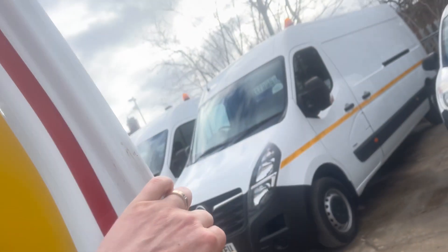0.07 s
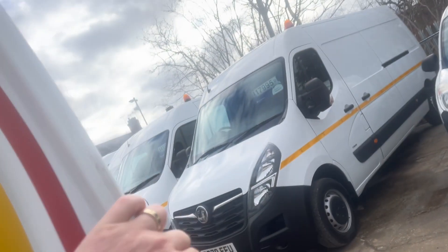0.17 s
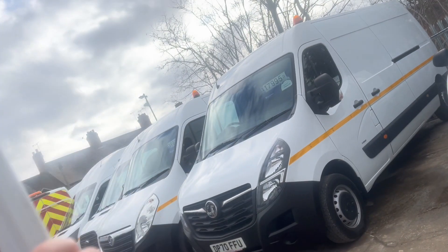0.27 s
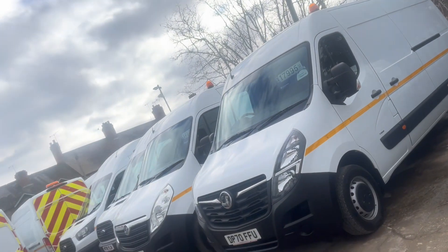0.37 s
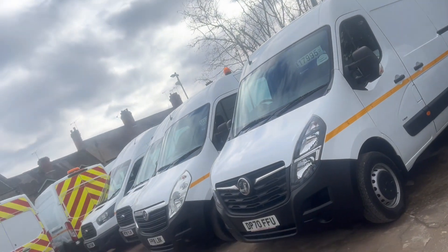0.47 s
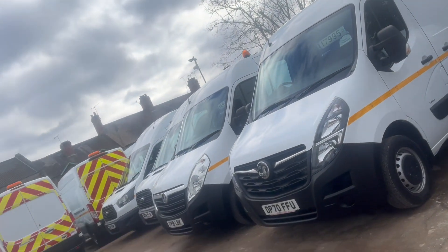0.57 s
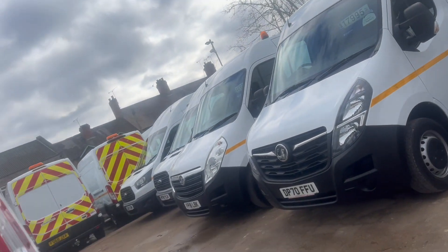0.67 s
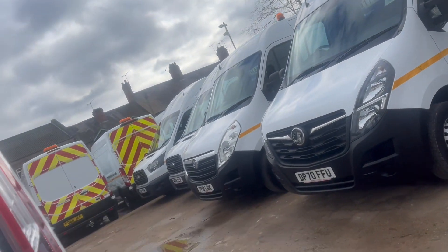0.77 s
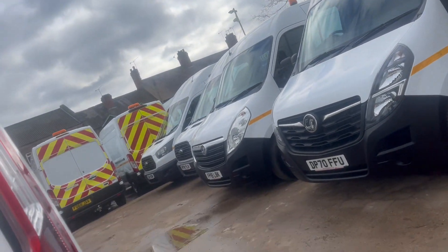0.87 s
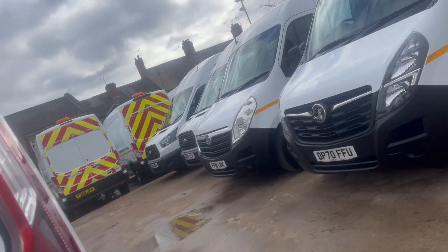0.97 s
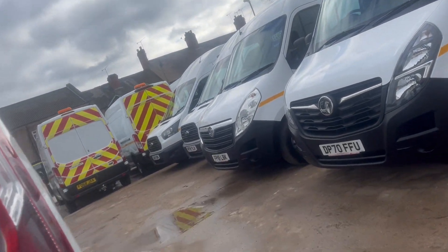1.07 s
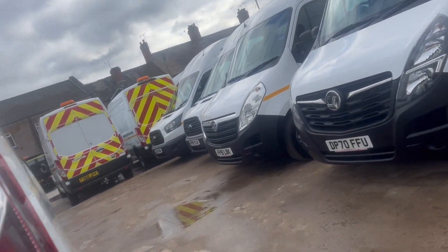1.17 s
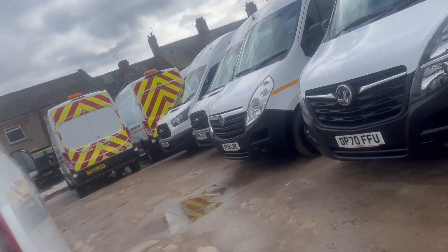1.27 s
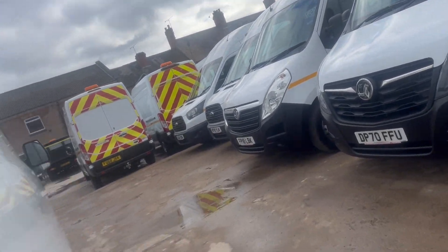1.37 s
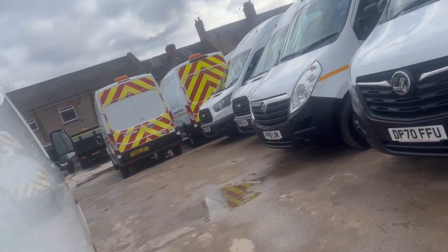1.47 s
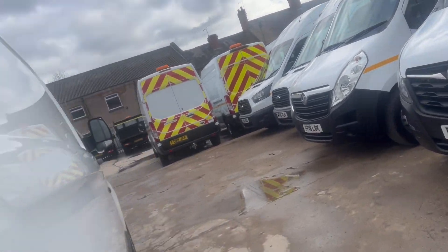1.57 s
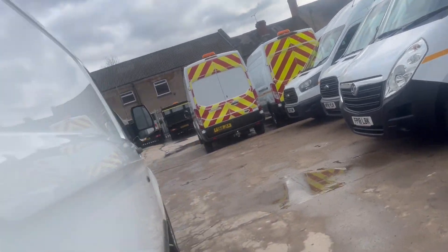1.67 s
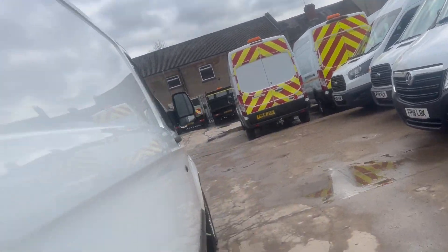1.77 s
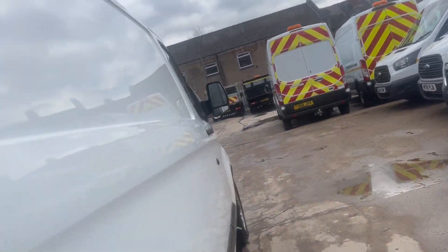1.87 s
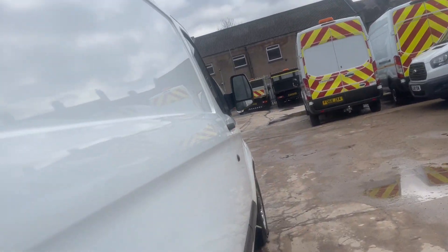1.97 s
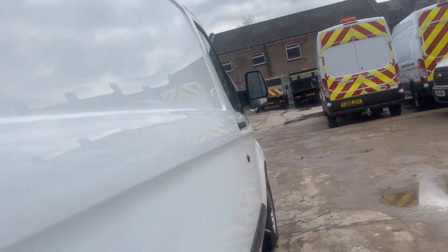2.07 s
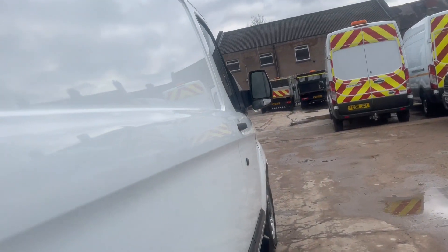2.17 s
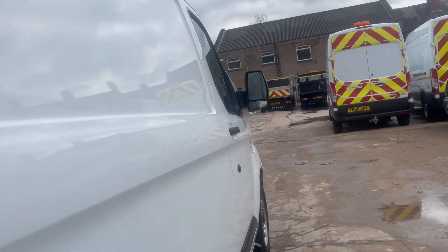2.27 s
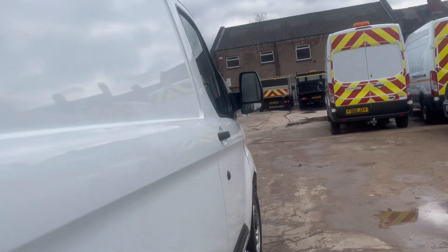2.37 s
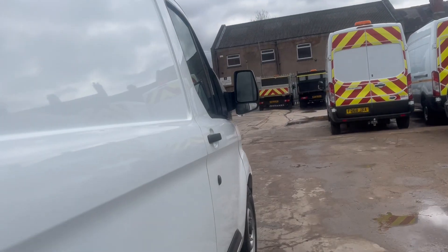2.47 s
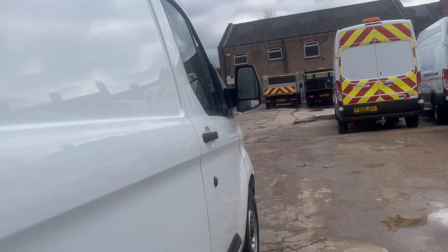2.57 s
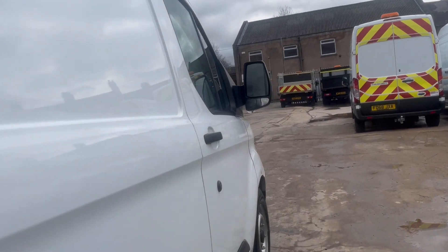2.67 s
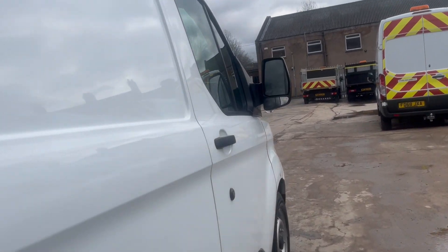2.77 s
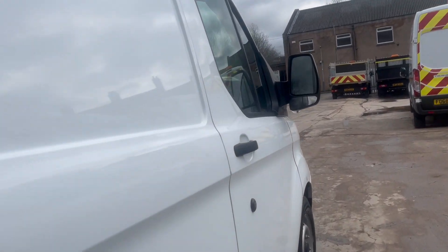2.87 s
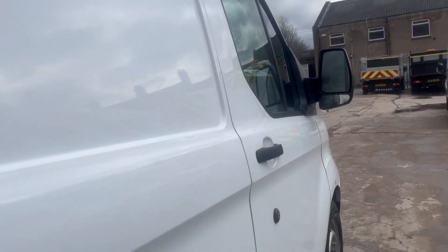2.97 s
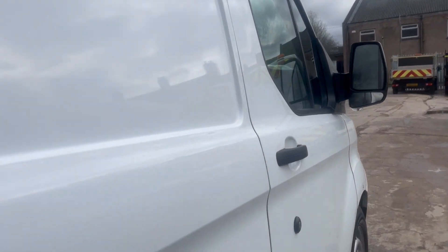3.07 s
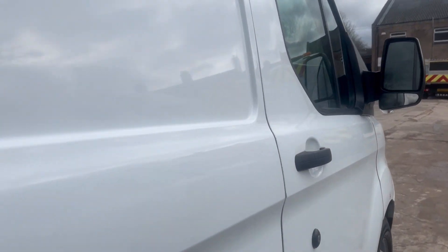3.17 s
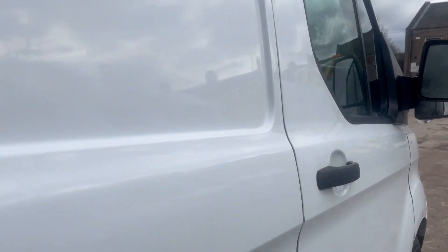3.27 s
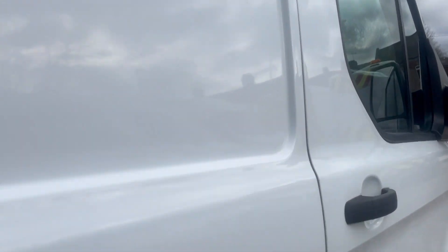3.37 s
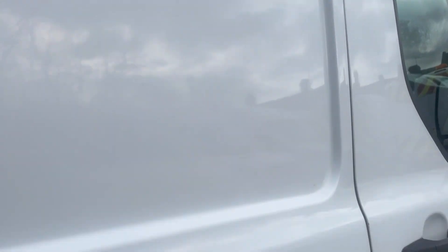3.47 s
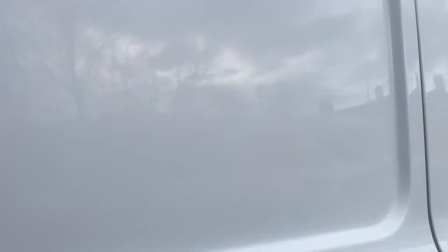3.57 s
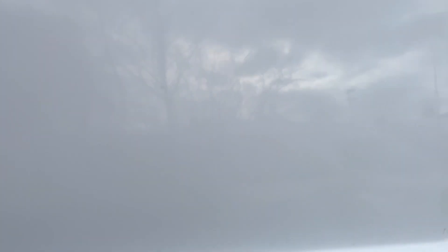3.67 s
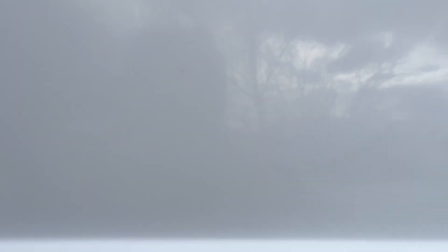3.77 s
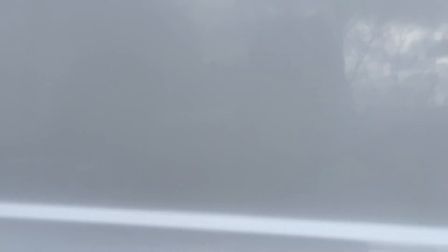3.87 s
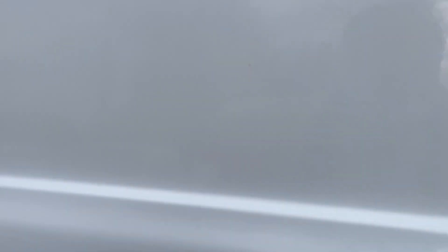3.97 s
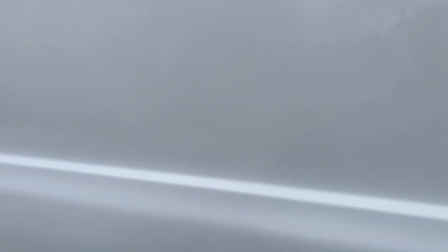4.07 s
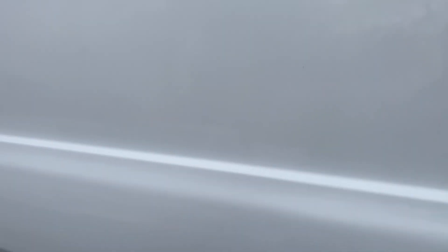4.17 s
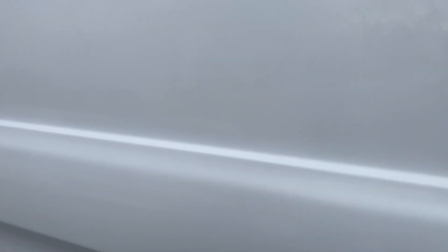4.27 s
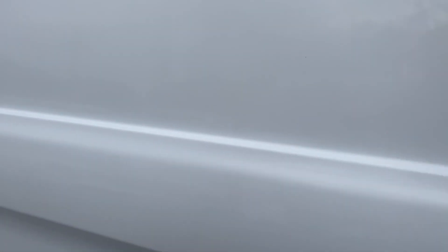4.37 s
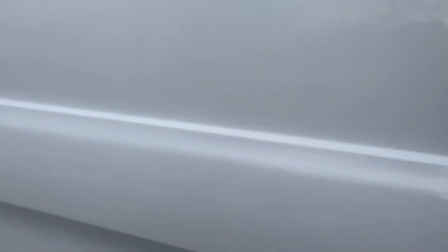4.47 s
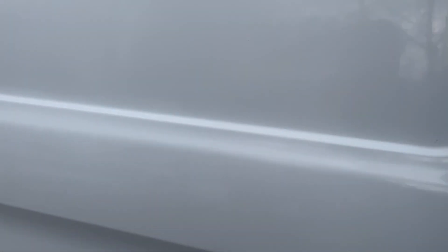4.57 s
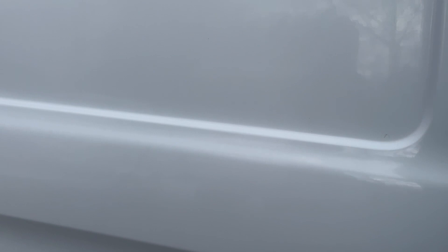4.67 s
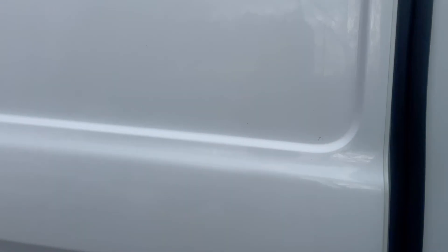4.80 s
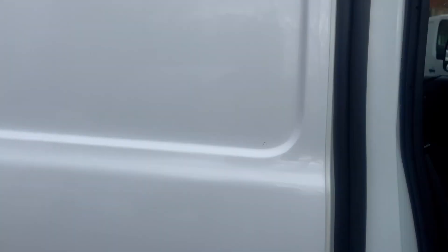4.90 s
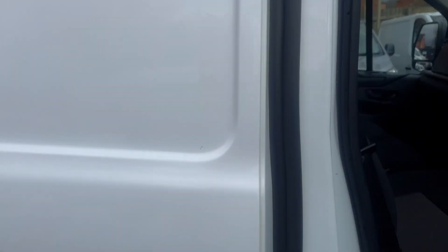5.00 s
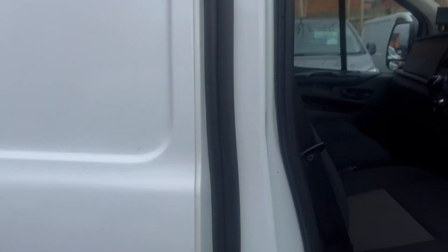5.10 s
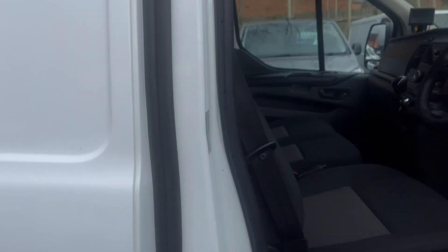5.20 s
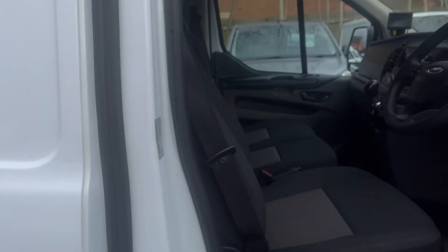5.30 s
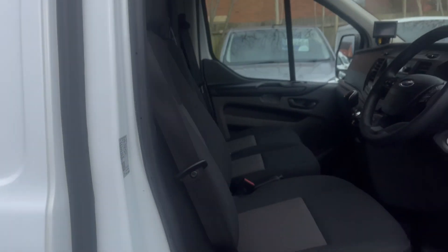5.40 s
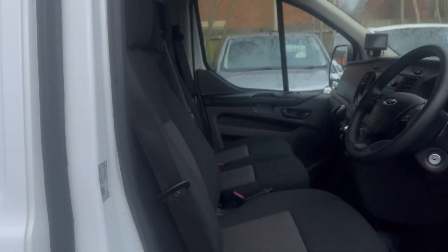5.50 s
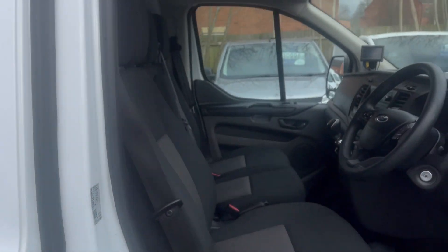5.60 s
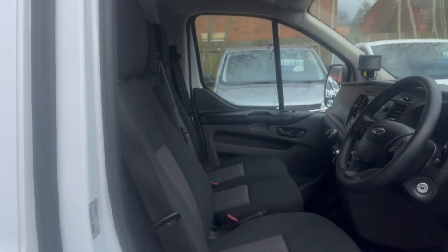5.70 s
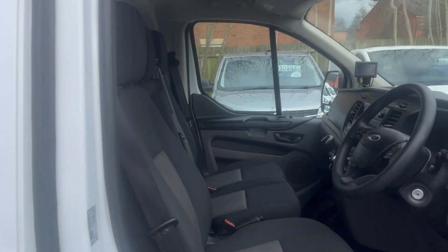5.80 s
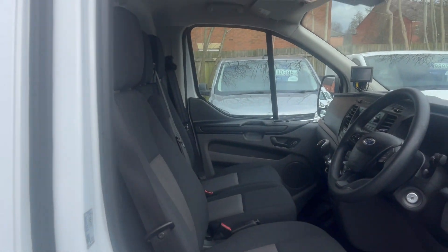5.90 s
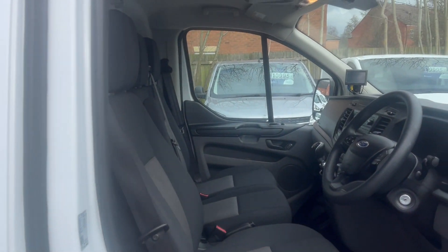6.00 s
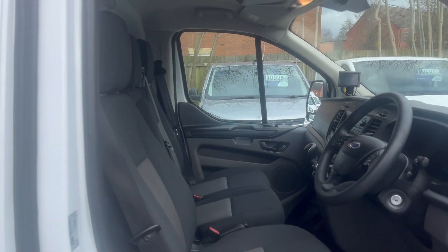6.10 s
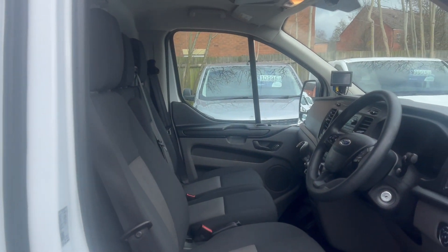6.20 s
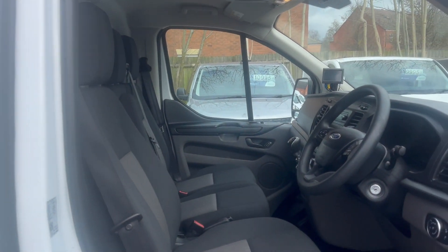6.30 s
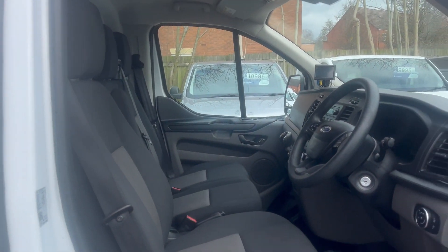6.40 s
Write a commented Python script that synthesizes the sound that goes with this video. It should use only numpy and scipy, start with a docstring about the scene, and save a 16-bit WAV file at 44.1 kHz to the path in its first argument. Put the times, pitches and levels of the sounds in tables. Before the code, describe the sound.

A van's metal door bangs shut outdoors; someone walks over gritty concrete, then a handle clunks and a door opens with small clicks.

```python
"""Van doors in an open yard

The rear doors are pushed to and slammed; someone walks over gritty concrete along the side, pulls the
cab handle and swings the door open. Impacts excite the modes of the steel panels and rattle the trim.
Friction makes cloth rustle and a hinge creak; small parts click over far traffic and faint birds.
All is heard at the two microphone ports of a phone in the walker's hand, where low air thuds."""
import sys
import numpy as np
from scipy import signal
from scipy.fft import rfft, irfft, next_fast_len
from scipy.io import wavfile
from scipy.ndimage import uniform_filter1d

SR = 44100
rng = np.random.default_rng(int(sys.argv[2]) if len(sys.argv) > 2 else 0)


def to_wav(s):
    """Save 16-bit WAV."""
    ch = np.atleast_2d(s).T  # columns
    pcm = np.round(np.clip(ch, -1, 1) * 32767)  # PCM
    wavfile.write(sys.argv[1], SR, pcm.astype(np.int16))


N = 284224
SIZE = next_fast_len(N)
TIME = np.arange(N) / SR
FREQ = np.maximum(np.arange(SIZE // 2 + 1) * SR / SIZE, 1)
DIRECT = np.array([[1], [0], [0]])  # the first of three paths: direct, left scatter, right scatter


def undb(db):
    """Amplitude ratio of a level in decibels."""
    return 10 ** (np.asarray(db) / 20)


def along(table, hz=FREQ):
    """Interpolation of (frequency [Hz], value) rows on a logarithmic frequency axis."""
    f, values = np.transpose(table)
    return np.interp(np.log(hz), np.log(np.maximum(f, 1)), values)


def curve(table, column, outside=-100):
    """Linear interpolation of one column over time, smoothed over 10 ms."""
    times, values = np.transpose(table)[[0, column]]
    return uniform_filter1d(np.interp(TIME, times, values, left=outside, right=outside), size=441)


def unit(x):
    """Normalisation to an rms of 1."""
    return x / np.sqrt(np.mean(x ** 2))


def shape(x, gain):
    """Filtering by multiplication of the spectrum."""
    return irfft(rfft(x, SIZE) * gain, SIZE)[..., :N]


def noise(gain):
    """Three uncorrelated noises of one spectrum, one for each path."""
    spectra = rng.standard_normal((3, 2 * len(FREQ))).view(complex)
    return unit(irfft(spectra * gain, SIZE)[:, :N])


def band(hz, octaves):
    """Gaussian passband on a logarithmic frequency axis."""
    return np.exp(-.5 * (np.log2(FREQ / hz) / octaves) ** 2)


def wander(rate):
    """Random modulation: ramps between values drawn rate times a second, with a spread near 1."""
    hold = int(SR / rate)
    return 1.38 * uniform_filter1d(np.repeat(rng.standard_normal(N // hold + 1), hold), hold)[:N]


def decay(t, t60):
    """Exponential damping by 60 dB in t60."""
    return np.exp(-np.log(1000) * t / t60)


def add(track, s, sound):
    """Superposition of a sound on a track at time s."""
    i = int(s * SR)
    track[..., i:i + sound.shape[-1]] += sound[..., :N - i]


def swell(s, db, rise, fall):
    """Start time and power of an exponential swell peaking at s; rise and fall each span 20 dB."""
    start = max(s - 3 * rise, 0)
    t = start + TIME[:int((s - start + 3 * fall) * SR)]
    return start, undb(2 * (db - 20 * np.where(t < s, (s - t) / rise, (t - s) / fall)))


def layered(events, bed_db, bed_offset_db):
    """Incoherent addition: gains of two bands, the second offset, as swells add in power to a bed."""
    power = undb(2 * np.array([bed_db, bed_db + bed_offset_db]))
    for *outline, offset_db in events:
        start, part = swell(*outline)
        add(power, start, part * undb(2 * np.array([[0], [offset_db]])))
    return np.sqrt(power)


# Ambient spectrum: (frequency [Hz], relative density [dB])
YARD_SPECTRUM = [(120, -20), (200, -8), (349, -5), (420, -11.5), (698, -10), (1790, -18), (2760, -39.5),
                 (5520, -27.5), (7290, -48), (8000, -81.5), (10400, -90), (17600, -120)]


def yard(level_db=-53):
    """Ambient noise: distant traffic and breeze, in octave bands that fluctuate independently."""
    air = rfft(rng.standard_normal((3, SIZE))) * undb(along(YARD_SPECTRUM))
    bands = [undb(1.57 * wander(1.43) + 1.16 * wander(3.3)) * irfft(air * band(hz, 0.36), SIZE)[:, :N]
             for hz in 250 * 2. ** np.arange(6)]
    return undb(level_db) * unit(sum(bands))


# Far calls: (start [s], end [s], first frequency [Hz], last frequency [Hz], level [dB])
BIRD_CALLS = [(1.95, 2.085, 2890, 2930, -66), (2.02, 2.06, 3100, 2950, -65), (5.757, 5.8, 3950, 3760, -60),
              (5.398, 5.425, 5100, 5300, -62), (5.398, 5.425, 4050, 4650, -63)]


def birds():
    """Frequency modulation: each faint whistle is a tone that glides and wavers."""
    out, waver = np.zeros(N), wander(160)
    for start, end, first_hz, last_hz, db in BIRD_CALLS:
        n = int((end - start) * SR)
        wobble = waver[int(start * SR):][:n]
        hz = np.linspace(first_hz, last_hz, n) * (1 + .008 * wobble)
        envelope = undb(db + 1.9 * wobble) * np.sqrt(np.hanning(n))
        add(out, start, envelope * np.sin(2 * np.pi * np.cumsum(hz) / SR))
    return out


# Low air between pushes: (time [s], level [dB])
AIR_BED = [(0, -47), (.13, -59.5), (.26, -60), (.35, -36.5), (.45, -32), (.64, -33.5), (.8, -37), (1., -47),
           (1.126, -76.5), (1.165, -56.5), (1.25, -38), (1.45, -33), (1.9, -41.5), (2.2, -47), (3.1, -51),
           (3.95, -53), (4.12, -45.5), (4.7, -46), (4.9, -39), (5.2, -50), (5.8, -46.5), (6.44, -48)]
# Pushes of air and grip on the ports: (peak time [s], level [dB], fall [s])
AIR_PUSHES = [(.154, -41, 0.053), (.31, -33, 0.086), (0.515, -18, 0.15), (.576, -17.5, 0.088),
              (.656, -20, 0.029), (0.905, -29.5, 0.079), (1.207, -13, 0.033), (1.27, -20.5, 0.071),
              (1.34, -21, 0.1), (1.55, -29.5, 0.042), (1.65, -32, 0.052), (1.76, -32, 0.053),
              (2.31, -41, 0.22), (2.62, -38.5, 0.082), (2.759, -37, 0.14), (2.89, -37, 0.063),
              (3.14, -38, 0.12), (3.278, -35, 0.059), (3.37, -37.5, 0.063), (3.72, -40.5, 0.087),
              (4.19, -24, 0.044), (4.22, -19, 0.051), (4.31, -30.5, 0.15), (4.438, -28.5, 0.03),
              (4.539, -31, 0.068), (4.78, -36.5, 0.14), (4.976, -27.5, 0.12), (5.179, -32, 0.072),
              (5.25, -37, 0.14), (5.4, -33.5, 0.056), (5.528, -28, 0.088), (5.66, -41, 0.074)]
# Rumble spectrum: (frequency [Hz], relative density [dB])
RUMBLE_SPECTRUM = [(15, -58), (28, -23), (40, 1), (55, 3), (85, 1), (125, -5.5), (200, -29), (400, -130)]


def air_thuds(flicker_db=4, rise_share=0.584):
    """Pressure fluctuation at the ports: each push swells a low, wavering tone and a rumble."""
    power = undb(2 * (curve(AIR_BED, 1) + flicker_db * wander(12)))
    for s, db, fall in AIR_PUSHES:
        add(power, *swell(s, db, rise_share * fall, fall))
    level_db = 10 * np.log10(uniform_filter1d(power, size=441))
    hz = 69.8 + 0.52 * (level_db + 45)  # harder pushes swing faster
    phase = 2 * np.pi * np.cumsum(hz * (1 + 0.1208 * wander(25))) / SR
    return undb(level_db) * (0.83 * np.sin(phase) + 1.034 * noise(undb(along(RUMBLE_SPECTRUM))))


# Strokes of cloth and soles: (peak time [s], level [dB], rise [s], fall [s], scrape offset [dB])
RUSTLE_STROKES = [(.014, -46, 0.011, 0.021, -1.5), (.04, -52, 0.0093, 0.11, 10),
                  (.4, -47, 0.1, 0.085, 10.5), (.856, -50, 0.023, .015, 1), (.89, -52.5, 0.037, 0.049, 2.5),
                  (.95, -48.5, 0.03, 0.11, 3), (1.183, -41.5, 0.012, 0.024, 27.5),
                  (2.17, -56.5, 0.094, .08, 8), (2.72, -57, 0.14, 0.1, 4), (2.8, -66, 0.08, 0.12, 17),
                  (3.02, -69, 0.1, 0.071, 21.5), (3.23, -49, 0.076, 0.082, 4.5),
                  (3.33, -62, 0.013, 0.019, 24), (3.84, -44.5, 0.13, 0.079, 1),
                  (4.103, -50.5, 0.019, 0.094, 13), (4.176, -46.5, 0.045, 0.049, 15),
                  (4.272, -51, .012, 0.1, 7), (4.344, -48, 0.11, 0.011, 5), (4.544, -52, 0.12, 0.18, 4),
                  (4.638, -53.5, 0.47, 0.017, 5.5), (4.994, -61, 0.2, 0.047, 12),
                  (5.048, -51, 0.0076, 0.016, -8), (5.174, -47.5, 0.023, 0.063, 10),
                  (5.346, -38.5, 0.0068, 0.027, 5), (5.618, -39, 0.011, 0.063, 9.5),
                  (5.652, -45, 0.04, 0.044, -1), (5.776, -76.5, 0.077, 0.54, 20),
                  (6.242, -61, 0.13, 0.18, 6)]
# Faint rustle under the strokes: (time [s], level [dB])
RUSTLE_FLOOR = [(0, -66.5), (.33, -63), (.5, -58.5), (.83, -67), (1.02, -60), (1.3, -58), (1.5, -59),
                (1.7, -61.5), (2.1, -64), (2.4, -70), (3.15, -71), (3.5, -70.5), (3.74, -67.5),
                (3.92, -66.5), (4.05, -60.5), (4.25, -74), (4.85, -64.5), (5.1, -68), (5.7, -69.5),
                (5.85, -71), (6.05, -67.5), (6.44, -69)]
# Cloth spectrum: (frequency [Hz], relative density [dB])
CLOTH_SPECTRUM = [(1500, -68), (2200, -3), (2900, 0), (3550, 1), (4000, 1), (4650, 1), (5400, 0),
                  (6500, -4), (9500, -6.5), (12500, -12.5), (14200, -9.5), (15200, -50)]


def rustle():
    """Friction noise: fibres and grit slip in dense tiny grains, with a duller scrape beneath."""
    hiss_gain, scrape_gain = layered(RUSTLE_STROKES, curve(RUSTLE_FLOOR, 1), bed_offset_db=8.5)
    hiss = unit(undb(1.7 * wander(260) + 1.26 * wander(30)) * noise(undb(along(CLOTH_SPECTRUM))))
    scrape = unit(undb(3.15 * wander(90)) * noise(band(1015, 0.78)))
    return hiss_gain * hiss + undb(-4.5) * scrape_gain * scrape


# Rubbing contacts: (start [s], end [s], frequency [Hz], level [dB], half-width [octaves])
RUBS = [(2.447, 2.493, 950, -44, 0.37), (2.495, 2.535, 950, -47.5, 0.3), (2.622, 2.672, 816, -43, 0.46),
        (2.721, 2.777, 792, -48, 0.48), (2.927, 2.999, 864, -41, 0.15), (3.007, 3.07, 932, -53, 0.27),
        (3.355, 3.383, 1500, -39, 0.3), (4.203, 4.303, 807, -44, 0.48), (5.155, 5.186, 1294, -44, 0.45),
        (5.158, 5.19, 3070, -50.5, 0.036), (3.789, 3.881, 1400, -48.5, 0.25),
        (3.79, 3.877, 4340, -45.5, 0.13), (4.268, 4.362, 4860, -50, 0.13), (4.257, 4.35, 3500, -52, 0.057),
        (4.274, 4.363, 2210, -57, 0.16), (4.454, 4.617, 1494, -47.5, 0.18), (4.47, 4.64, 4460, -54.5, 0.1),
        (5.605, 5.66, 2216, -39, 0.067), (5.612, 5.66, 3800, -47, .025), (5.607, 5.662, 4580, -48, .025),
        (5.62, 5.668, 5700, -48.5, .02), (5.342, 5.405, 1348, -53.5, 0.3)]


def scuffs():
    """Resonance driven by friction: each rub is a narrow band of gritty noise that swells and fades."""
    out, grit, friction = np.zeros((3, N)), wander(146), rng.standard_normal((3, N))
    for start, end, hz, db, octaves in RUBS:
        i, n = int(start * SR), int((end - start) * SR)
        resonance = signal.butter(2, hz * 2 ** (octaves * np.array([-1, 1])), "band", fs=SR, output="sos")
        envelope = undb(db + 2.2 * grit[i:i + n]) * np.sqrt(np.hanning(n))
        add(out, start, envelope * unit(signal.sosfilt(resonance, friction[:, i:i + n])))
    return out


# Panels struck, touched or passed: (peak time [s], level [dB], rise [s], fall [s], light offset [dB])
MURMUR_SWELLS = [(.07, -47.5, .1, 0.17, 1.5), (.33, -41, 0.024, 0.0091, -15),
                 (.66, -48.5, 0.018, 0.33, -4.5), (.992, -43, 0.023, 0.11, 6),
                 (1.185, -26.5, 0.017, 0.018, 7), (1.36, -29, 0.055, 0.43, -12),
                 (1.54, -36.5, 0.26, 0.91, -23), (2.83, -47.5, 0.95, 0.032, -10),
                 (2.94, -50.5, 0.066, 0.2, 0), (3.16, -42.5, 0.12, 0.16, -6.5),
                 (3.38, -36, 0.047, 0.0094, 3), (3.7, -44, 0.028, 0.038, -10),
                 (3.77, -44, 0.0099, 0.38, -6.5), (4.14, -30, 0.049, 0.027, -9),
                 (4.23, -34.5, 0.032, 0.13, -2.5), (4.534, -51, 0.083, 0.33, -16),
                 (4.75, -31, 0.061, 0.019, -11.5), (4.9, -42.5, 0.18, 0.36, -6),
                 (5.194, -38, 0.069, 0.065, -3.5), (5.358, -35.5, 0.23, 0.035, -9),
                 (5.638, -45.5, 0.061, 0.053, 0), (5.806, -57, 0.052, 0.28, -7),
                 (6.186, -62, 0.098, 0.32, -5)]
# Murmur under the swells: (time [s], level [dB], light offset [dB])
MURMUR_BED = [(0, -63.5, 14), (.2, -53, 3), (.31, -48, -6), (.8, -57, -5), (1.14, -61.5, 19.5),
              (2.2, -57.5, -0.5), (2.35, -58, 0), (2.45, -63, 7), (3.4, -52.5, -19), (3.7, -55, -10),
              (4.05, -52.5, -13), (4.5, -66.5, 5.5), (5.45, -50, -5), (5.6, -63, 3), (6.44, -59.5, -2)]


def body_murmur():
    """Amplitude-modulated noise: the body murmurs in a dark and a light band that swell together."""
    dark, light = (unit(undb(2.0 * wander(25)) * noise(band(hz, 0.45))) for hz in (175, 380))
    dark_gain, light_gain = layered(MURMUR_SWELLS, curve(MURMUR_BED, 1), curve(MURMUR_BED, 2))
    return dark_gain * dark + light_gain * light


# Dry hinge: (time [s], level [dB], slip rate [Hz], relative overtone level [dB])
HINGE_SLIPS = [(.97, -70, 330, -34), (.99, -41, 370, -26), (1.05, -41, 430, -17), (1.068, -41, 540, -24),
               (1.105, -43, 510, -24), (1.12, -47, 615, -13), (1.145, -44, 630, -14), (1.16, -60, 630, -22)]


def hinge_creak():
    """Stick-slip motion: the hinge gives a rough harmonic tone that rises with the slip rate."""
    slip_hz = curve(HINGE_SLIPS, 2, outside=300) * (1 + .008 * wander(120))
    phase = 2 * np.pi * np.cumsum(slip_hz) / SR
    overtones = undb(curve(HINGE_SLIPS, 3)) * sum(np.sin(k * phase) for k in range(2, 5))
    roughness = 1.1 + .55 * noise(band(45, 1.0))
    return undb(curve(HINGE_SLIPS, 1)) * roughness * (np.sin(phase) + overtones)


# Grit under the soles, and dull knocks:
# (time [s], level [dB], frequency [Hz], envelope t60 [s], relative crack [dB], left minus right [dB])
GRIT_CRUNCHES = [(.16, -39, 1100, .04, -21, 0), (.193, -37, 1100, 0.065, -20, 0),
                 (.225, -40, 704, .05, -20, 0), (2.45, -35.5, 810, 0.081, -28, 8),
                 (2.458, -31, 1000, 0.12, -24, 5), (2.505, -41, 950, .1, -25, 8),
                 (2.48, -42, 724, 0.083, -24, 10), (2.636, -34.5, 380, 0.15, -28, 6),
                 (2.657, -35, 960, 0.053, -23, 9), (2.731, -34, 840, 0.056, -19, 4),
                 (2.777, -20, 760, 0.016, -36, 6.5), (2.783, -31, 690, 0.086, -22, 5),
                 (2.825, -30.5, 744, 0.045, -18, 5), (2.853, -42, 1230, .04, -20, 6),
                 (2.858, -44, 473, 0.056, -10, 11), (2.935, -25.5, 680, 0.1, -30, 6),
                 (2.949, -32, 788, 0.077, -31, 11), (2.977, -37, 895, 0.079, -20, 7),
                 (3.025, -40, 958, 0.17, -17, 12), (3.049, -42, 546, 0.068, -18, 6),
                 (3.094, -29.5, 740, 0.04, -24, 4), (3.143, -33, 400, 0.04, -33, -1),
                 (3.315, -29, 617, 0.039, -15, 6), (3.3525, -21, 455, .04, -31, 3),
                 (3.3512, -17.5, 1080, 0.015, -13, 10), (3.356, -26.5, 1146, .05, -18, 9),
                 (3.3742, -16.5, 1510, 0.011, -3.5, 12), (3.3757, -16.5, 608, 0.027, -15, 4),
                 (4.234, -40, 1190, 0.055, -25, 0), (3.695, -31, 399, 0.04, -22, 3),
                 (3.776, -22, 305, 0.05, -34, 0), (5.158, -37.5, 972, 0.061, -21, -13),
                 (5.168, -31, 890, 0.055, -14, 0), (5.334, -40, 905, .03, -25, -2),
                 (5.626, -27, 556, 0.036, -25, 0), (5.386, -40, 1340, 0.087, -6, 5)]
# Latch, hinge and key ticks: columns as above
METAL_TICKS = [(0.0376, -29.5, 4140, 0.023, -10, 12), (.3482, -16, 4360, 0.026, -19, 11.5),
               (0.485, -43, 1330, 0.055, -11, -7), (0.836, -44.5, 2960, 0.03, 6.5, 4),
               (0.85, -42.5, 3620, 0.073, -11, 13), (0.883, -34.5, 1540, 0.05, -7, 0),
               (0.946, -36.5, 3440, 0.067, -7, 11), (0.9525, -33.5, 1650, 0.045, -8, 0),
               (0.97, -37, 4580, 0.051, 1, 6), (0.995, -41.5, 3820, 0.054, -4, 19),
               (1.0436, -43.5, 1600, 0.11, -2.5, 1), (1.4223, -38, 1370, 0.067, -12, 3),
               (1.423, -45, 2880, .04, -20, 2), (1.488, -45, 2900, .04, -20, 0),
               (1.559, -45, 2850, .04, -18, 0), (1.757, -46, 4300, .04, -15, 4),
               (3.236, -33, 1640, 0.042, -15, -3), (3.826, -29, 4450, 0.027, -12, 6),
               (4.061, -41, 4230, 0.019, -11, 7), (4.066, -42, 13000, 0.026, -9, 0),
               (3.7, -54, 6000, .03, 6, 2), (3.732, -46, 11000, 0.033, -8, 0),
               (3.768, -39, 10600, 0.041, -8, 0), (4.1018, -54, 1750, 0.038, -12, 3),
               (4.1215, -42, 9900, 0.019, -8, -1), (4.135, -49, 1440, 0.042, -13, -8),
               (4.1747, -42, 1270, 0.055, -23, -7), (4.257, -42, 3700, 0.025, -20, -1),
               (4.9502, -51, 1470, 0.043, -15, 4), (4.9804, -39, 1920, 0.071, -12, 1),
               (5.046, -34.5, 1800, 0.016, -23, -2), (5.1749, -35.5, 1980, 0.024, -12, 13),
               (5.279, -34.5, 1746, 0.058, -13, 1), (5.279, -43, 2200, 0.039, -15, -2),
               (2.835, -46.5, 4500, .03, -14, 8), (5.333, -42, 1300, 0.036, -12, 7),
               (5.3454, -43, 1260, 0.048, -19, -6), (5.6163, -33.5, 1800, 0.11, -20.5, 5),
               (5.6397, -24, 2247, 0.042, -26, 6), (5.645, -40, 2380, 0.051, -4, 6),
               (5.676, -40, 4370, 0.033, -12, 4), (5.708, -44.5, 4390, .03, -17, 7),
               (5.223, -45.5, 4840, 0.044, -12, 5)]


def clicks(table, crack_hz, q, tone_gain):
    """Impulse response of small parts: a noisy ring under a bright crack, on three paths per port."""
    out, t = np.zeros((2, 3, N)), TIME[:int(.12 * SR)]
    bright = noise(band(crack_hz, 0.59))
    forces = rng.standard_normal((len(table), 3, len(t)))
    attack = 1 - np.exp(-t / 0.00023)
    for (s, db, hz, t60, crack_db, pan_db), force in zip(table, forces):
        b, a = signal.iirpeak(hz, q, fs=SR)
        resonance = unit(signal.lfilter(b, a, signal.lfilter(b, a, force)))
        tone = tone_gain * np.sin(2 * np.pi * hz * t) * decay(t, 0.033)
        ring = (tone + 0.51 * resonance) * decay(t, t60)
        crack = undb(crack_db) * bright[:, int(s * SR):][:, :len(t)] * decay(t, 0.35 * t60)
        port_gains = undb(db - 4.0 + np.reshape([pan_db, -pan_db], (2, 1, 1)) / 2)
        add(out, s, port_gains * attack * (ring + crack))
    return out


# Single modes: (time [s], level [dB], frequency [Hz], t60 [s], rise [ms])
RINGING_MODES = [(.002, -48, 317, 0.4, 7.3), (.222, -36.5, 315, 0.12, 4.2), (.348, -11, 2210, 0.097, 0.2),
                 (0.347, -22, 4600, .07, .2), (.372, -20, 2450, 0.089, 1), (.355, -21, 1445, .1, 1),
                 (0.346, -18, 876, 0.064, 0.13), (.35, -14.5, 502, 0.061, 0.33),
                 (.512, -25.5, 642, 0.03, 0.3), (.601, -27, 560, .03, .3), (1.142, -31, 310, .15, 3),
                 (1.155, -34, 930, .08, 2), (1.161, -23, 330, .1, 4), (1.19, -8.5, 428.4, 0.24, 2),
                 (1.216, -12, 330, .12, 2), (1.262, -16, 349.5, .2, 3), (1.19, -5.5, 1464, 0.039, .3),
                 (1.195, -16.5, 47, 1.2, 27), (1.199, -22, 61.2, 1, 13), (1.335, -19.5, 96, .3, 3.6),
                 (1.193, -12.5, 5680, 0.023, 0.222), (1.198, -10.5, 1770, .04, .3),
                 (1.222, -7, 1390, 0.052, 1.1), (1.243, -5.5, 2195, 0.034, 0.5),
                 (1.268, -19, 1740, .05, 1.5), (1.29, -21, 1313, 0.08, 1.7), (1.325, -35, 1540, 0.22, 8.7),
                 (4.122, -22, 119.9, .08, 4), (4.161, -16, 393, .18, 1.7), (4.18, -21, 261, .15, 2.7),
                 (4.171, -15.5, 996, 0.046, 1.2), (4.212, -21, 385, .1, 2.7), (4.212, -16, 231, 0.069, 1.6),
                 (4.773, -5.5, 1100, 0.024, 0.18), (4.775, -21.5, 3030, 0.042, 0.4),
                 (4.777, 12.5, 219, 0.049, 9.2), (4.826, -10, 200, 0.063, 3), (5.615, -34, 6100, 0.047, .2)]


def rings():
    """Damped free vibration: latch parts and door skin ring, and the empty load bay booms."""
    out, t = np.zeros(N), TIME[:SR]
    for s, db, hz, t60, rise_ms in RINGING_MODES:
        attack = (1 - np.exp(-t / (rise_ms * 1e-3))) ** 2
        add(out, s, undb(db) * attack * decay(t, t60) * np.sin(2 * np.pi * hz * t))
    return out


# Sheet metal pops: (time [s], level [dB], first frequency [Hz], last frequency [Hz], glide [ms], t60 [s])
SHEET_POPS = [(0.5115, -6.5, 486, 139.3, 5.3, 0.064), (.553, -9.5, 332, 109.6, 6.8, .09),
              (.6, -9, 450, 130, 4.9, 0.073), (4.162, -3, 470, 86.7, 4, 0.15)]


def dents():
    """Buckling: sheet metal pops in, and its pitch falls as the tension slackens."""
    out, t = np.zeros(N), TIME[:int(.2 * SR)]
    attack = 1 - np.exp(-t / 0.0017)
    for s, db, first_hz, last_hz, glide_ms, t60 in SHEET_POPS:
        hz = last_hz + (first_hz - last_hz) * np.exp(-t / (glide_ms * 1e-3))
        add(out, s, undb(db) * attack * decay(t, t60) * np.sin(2 * np.pi * np.cumsum(hz) / SR))
    return out


# Steel panel modes: (frequency [Hz], weight [0.5 dB], unscaled t60 [s])
PANEL_MODES = [(58, -18.5, 0.38), (89, -2, 0.14), (204.3, -4, 0.39), (227, -5.5, 0.34), (360, -3, 0.5),
               (473.3, 13, 0.21), (115, -3, 0.23), (166.2, -7, 0.52), (245, -22, 0.73), (311.2, -12, 0.71),
               (422.6, -4, 0.4), (548, 7.5, 0.2), (665, -32, 0.11), (905, 16, 0.098), (1207, 29, 0.08),
               (1487, 5.5, 0.25), (1950, -24.5, 0.11), (2110, 9.5, 0.21), (2470, 15, 0.17), (3120, 3, 0.29),
               (5600, -27, 0.038)]
# Trim rattle bands: (frequency [Hz], unscaled t60 [s])
TRIM_BANDS = [(120, 0.63), (300, 0.27), (700, 0.21), (1500, 0.15), (3000, 0.13), (5500, 0.15),
              (11000, 0.11)]
# Share of each rattle band: (level [dB])
TRIM_LEVELS = [-12, -10.5, -11.5, -7.5, -3.5, -5, 9]
# Blows on the body, with boom, knock, crack and patch relative to the level: (time [s], level [dB],
# boom [dB], knock [dB], crack [dB], main-band rattle t60 [s], patch frequency [Hz], patch [dB])
DOOR_BLOWS = [(.348, -10, -4, -4, -16, 0.25, 320, -8), (.465, -23, -5, -23, -29, 0.11, 303, -1),
              (.483, -23, 1, -17, -23, 0.086, 300, 4.5), (.492, -10, -3, -39.5, -46, 0.14, 126.6, 5),
              (.512, -8.5, -2.5, -43, -54, 0.093, 97.6, 1.5), (.533, -19, 7.5, -33, -48, 0.15, 100, -5.5),
              (.547, -15, 14, -40, -50, 0.053, 110, -4), (.573, -28.5, -6, -17.5, -28.5, 0.27, 99, 6),
              (.602, -13.5, 5, -41, -38, 0.066, 137, -2), (0.64, -26.5, 18.5, -20, -27, 0.072, 164, -4),
              (0.655, -51, 7, -25, -31, 0.11, 91.5, -16), (1.178, -23, -9, 1, -19, 0.08, 379, 7.5),
              (1.187, -5.5, -3.5, -3.5, -23.5, 0.14, 204, -25),
              (1.192, -2, -16, -36, -15.5, 0.11, 442, 0.5), (1.2, -6, 6.5, -25, -56, 0.12, 106, 6),
              (1.209, -13, -4, -23, -40, .15, 111.5, 1), (1.219, -7, -30, -16.5, -27.5, 0.33, 118, -6.5),
              (1.227, -15, -6, -1, -18.5, 0.19, 241, -3.5), (1.241, -12, -22.5, -24, -8, 0.14, 165.7, 2.5),
              (1.264, -18, -9, -4.5, -19.5, 0.16, 202, -2), (1.273, -9, -5, -20.5, -41, 0.15, 125, 5),
              (1.289, -14.5, -8, -41, -20.5, 0.14, 184, 6.5), (1.303, -16, 2, -23, -42, 0.14, 110, 1.5),
              (1.33, -30.5, -2, -25, -35, 0.28, 90, 7), (4.129, -30.5, 5, -15, -29, 0.31, 99.6, -15),
              (4.159, -12.5, -3.5, -19.5, -33.5, 0.14, 95, -19),
              (4.198, -20.5, -14, -29, -50, 0.2, 94, -12), (4.215, -19.5, -25, -25, -71, 0.15, 93.6, -23),
              (4.754, -29.5, -8, -1, -18.5, 0.36, 334.5, 1.5),
              (4.774, -11.5, -10, -8, -20.5, 0.097, 399, -4), (4.781, -11, -11, -3.5, -83, 0.21, 219, -20),
              (4.828, -22.5, 10.5, -35, -48, 0.067, 203, 2)]
BLOW_BANDS_HZ, FIZZ_DB = (110, 330, 1300, 5000, 11000), -16  # boom, main, knock, crack, fizz


def door_blows():
    """Modal superposition: each blow rings the panels, flexes the struck patch and rattles the trim."""
    out, t = np.zeros((3, N)), TIME[:2 * SR // 5]
    hz, weight, t60 = np.transpose(PANEL_MODES)
    trim_noises = [noise(band(f, 0.51)) for f, _ in TRIM_BANDS]
    draws = rng.random((len(DOOR_BLOWS), 2, len(hz)))
    for blow, (detune, strength) in zip(DOOR_BLOWS, draws):
        s, db, boom_db, knock_db, crack_db, ring_s, patch_hz, patch_db = blow
        colour = list(zip(BLOW_BANDS_HZ, (boom_db, 0, knock_db, crack_db, crack_db + FIZZ_DB)))
        stretch = ring_s / along(TRIM_BANDS, BLOW_BANDS_HZ[1])  # all decays scale together
        polarity = np.sign(detune - .5)  # modes start in either direction
        gains = polarity * undb(along(colour, hz) + 0.5 * weight + 5.0 * strength - 16.5)
        tones = np.sin(2 * np.pi * np.outer(hz * (1 + 0.0326 * (detune - .5)), t))
        panels = gains @ (tones * decay(t, stretch * t60[:, None]))
        patch_phase = 2 * np.pi * patch_hz * (t + 0.000676 * (1 - np.exp(-t / 0.0017)))  # pitch drops
        patch = undb(patch_db) * np.sin(patch_phase) * decay(t, 0.74 * ring_s)
        i = int(s * SR)
        rattle = sum(undb(along(colour, f) + share_db) * decay(t, stretch * fade) * trim[:, i:i + len(t)]
                     for (f, fade), share_db, trim in zip(TRIM_BANDS, TRIM_LEVELS, trim_noises))
        rise_s = 0.00037 * undb(-.45 * knock_db)  # a dull blow is a softer, longer push
        add(out, s, undb(db) * (1 - np.exp(-t / rise_s)) * (DIRECT * (panels + patch) + rattle))
    return out


# Scattered sound, unlike at the two ports: (frequency [Hz], share of power [0-1])
DIFFUSE_SHARE = [(30, 0.16), (80, 0.08), (250, 0.03), (700, 0.43), (2000, 0.88), (5000, 0.88), (8000, 0.27),
                 (13000, 0.17)]


def ports(paths, lead, balance_db=0.):
    """Partial coherence: the ports share the direct path, shifted in phase, but not the scatter."""
    diffuse = np.clip(along(DIFFUSE_SHARE), 0, 1)
    half = undb(balance_db / 2) * np.exp(.5j * np.interp(FREQ, *np.transpose(lead)))
    response = np.array([half, 1 / half])
    direct = shape(paths[0], np.sqrt(1 - diffuse) * response)
    return direct + shape(paths[1:], np.sqrt(diffuse) * np.abs(response))


# Left port's lead for the surroundings, rear doors and cab door: (frequency [Hz], phase [rad])
AROUND_LEAD = [(0, 0), (950, -1.7), (1550, -1.9), (1810, 0.6), (2500, 0.6), (3530, 3.0), (6030, -2.2),
               (7410, -2.2), (7670, -2.9), (9220, -3.5), (11100, -6.2), (13000, -6.5), (14600, -9.3),
               (16000, -9.5)]
REAR_LEAD = [(0, 0), (1120, 2.2), (1810, 0.8), (4050, 2.2), (5940, -1.7), (7060, -1.6), (8100, -3.2),
             (8960, -3.2), (10100, -5.1), (13200, -7.1), (13500, -8.0), (14000, -7.8), (15100, -9.4),
             (16000, -9.4)]
CAB_LEAD = [(0, 0), (860, -2.9), (1380, -1.7), (1890, -5.8), (3700, -5.9), (4570, -4.9), (5080, -5.2),
            (6200, -0.7), (7670, -2.9), (8870, -3.3), (11100, -6.1), (12900, -6.5), (14600, -9.2),
            (16000, -9.5)]
# Level difference for the rear doors and cab door: (frequency [Hz], left minus right [dB])
REAR_PAN = [(60, -1), (110, 2), (200, 1.5), (380, 0.5), (700, -0.5), (1290, -2), (2380, 1), (4400, 7.5),
            (8120, -4), (15000, 1)]
CAB_PAN = [(60, -3), (110, 0), (200, -1.5), (380, 0.5), (700, -6.5), (1290, -9.5), (2380, -0.5),
           (4400, 10.5), (8120, 4), (15000, -2)]


def scene(cab_from_s=3):
    """Localisation: phase and level differences give surroundings, rear doors and cab their directions."""
    around = air_thuds() + rustle() + scuffs() + body_murmur() + hinge_creak() + yard()
    steps = clicks(GRIT_CRUNCHES, crack_hz=3500, q=1.3, tone_gain=.9)
    ticks = clicks(METAL_TICKS, crack_hz=7000, q=2.2, tone_gain=.7)
    left, right = around + steps + ticks
    surroundings = np.array([ports(left, AROUND_LEAD)[0], ports(right, AROUND_LEAD)[1]])
    doors = door_blows() + DIRECT * (rings() + dents())
    at_cab = TIME > cab_from_s
    rear = ports(doors * ~at_cab, REAR_LEAD, along(REAR_PAN))
    cab = ports(doors * at_cab, CAB_LEAD, along(CAB_PAN))
    return surroundings + birds() + rear + cab


def record(dry, notch_hz=8450, width_hz=330, notch_db=-24, top_hz=15800):
    """Antiresonance of the port cavity cancels a band; saturation rounds peaks; the top is cut."""
    notch = undb(notch_db * np.exp(-.5 * ((FREQ - notch_hz) / width_hz) ** 2))
    rounded = np.tanh(0.95 * shape(dry, notch)) / 0.98
    return signal.sosfilt(signal.ellip(10, .2, 80, top_hz, fs=SR, output="sos"), rounded)


dry = scene()
out = record(dry)
to_wav(out)
```